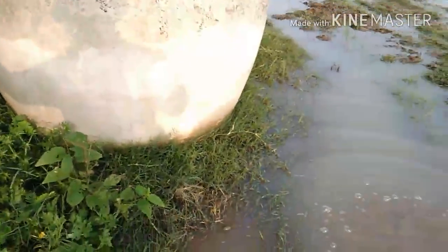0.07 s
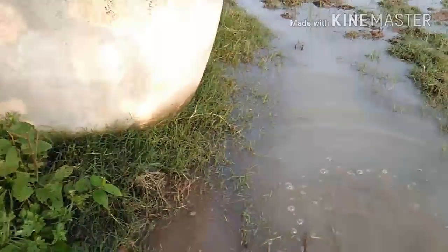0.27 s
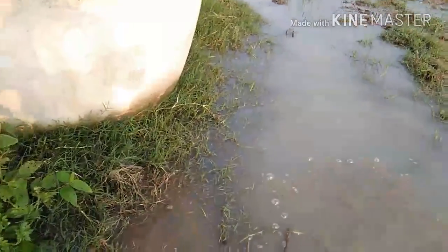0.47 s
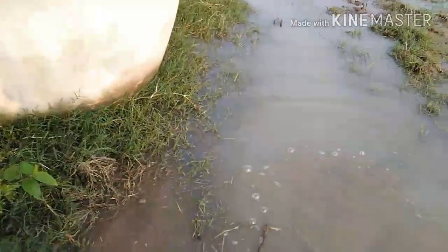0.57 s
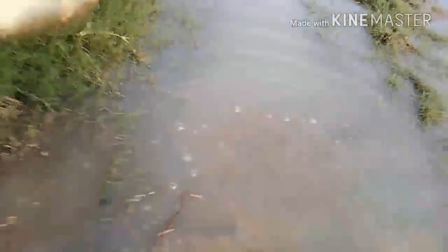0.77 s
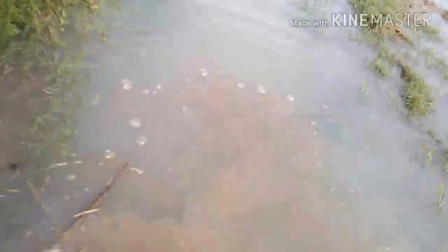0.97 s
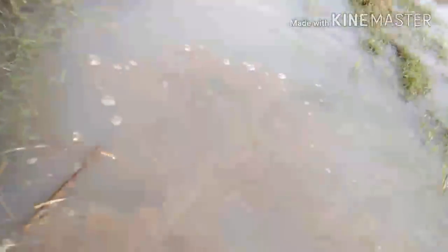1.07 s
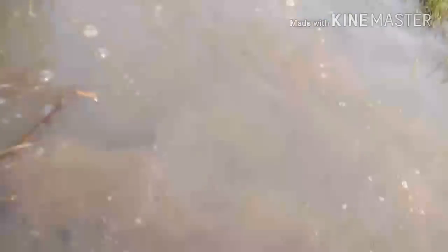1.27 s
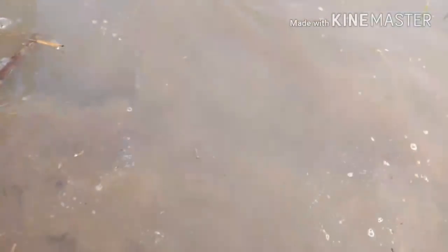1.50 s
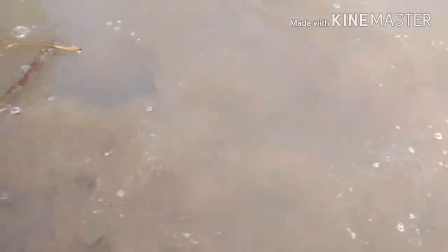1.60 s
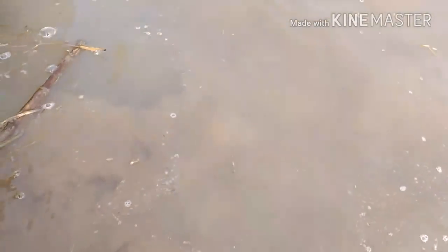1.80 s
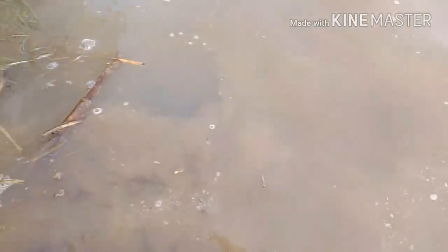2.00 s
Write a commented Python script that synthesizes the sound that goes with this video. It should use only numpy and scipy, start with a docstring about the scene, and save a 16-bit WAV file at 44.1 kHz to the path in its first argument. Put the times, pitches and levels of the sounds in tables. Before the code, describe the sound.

A loud splash in shallow water outdoors: a few quick slaps, a heavy plunge and falling spray. It dies away, then water laps, bubbles and drips close to the microphone while a distant bird chirps faintly.

```python
"""A few slaps, a big splash and falling spray: something plunges into the shallow water of a flooded field.
The sound dies away in the open air and a few drops plop. Water then laps and bubbles close by,
while a distant bird repeats a falling chirp. The splash is thousands of tiny impacts,
each bubble is trapped air ringing like a little bell, and each chirp is a sliding whistle."""
import sys
import numpy as np
from scipy import signal
from scipy.io import wavfile
from scipy.ndimage import uniform_filter1d

SR = 44100
rng = np.random.default_rng(int(sys.argv[2]) if len(sys.argv) > 2 else 0)


def to_wav(sig):
    """Store sig (one row per channel, or 1-D mono) as 16-bit WAV at the path in sys.argv[1].

    Samples outside -1..1 are clipped; the rate is SR.
    """
    pcm = np.clip(np.atleast_2d(sig), -1, 1) * 32767
    pcm = np.round(pcm).astype(np.int16)
    wavfile.write(sys.argv[1], SR, pcm.T)  # frames by channels


N = 90404
T = np.arange(N) / SR

# tone of the churning water, the gulps of air and the spray (frequency [Hz], level [dB])
CHURN_TONE = [(200, -56), (600, -1.5), (1000, -6.5), (1500, -1.5), (2000, -1.5), (2700, -4), (3600, -12.5),
              (4500, -22.5), (6500, -37.5), (15000, -67)]
GULP_TONE = [(40, -47), (120, -30.5), (190, -14), (280, -4), (450, 2.5), (650, -0.5), (900, -6.5),
             (1500, -7), (4000, -51.5)]
SPRAY_TONE = [(1500, -23), (3000, 14), (5000, 6.5), (7000, -3), (10500, 2.5), (12500, -7.5), (15500, -14)]
# slaps on the water (time [s], level [dB], fade time [s], gulp boost [dB], spray boost [dB])
WATER_SLAPS = [(0.128, -32, 0.16, -4.5, 15.5), (0.216, -17.5, 0.24, -3, 7), (0.265, -19, 0.41, -24, 3),
               (0.271, -21, 0.043, -8, 17.5), (0.289, -29, 0.077, 12.5, -10), (0.32, -11.5, 0.59, -6, -11),
               (0.365, -14, 0.37, -7.5, -18), (0.411, -17, 0.23, -4.5, -4), (0.449, -19, 0.26, -6, 2.5),
               (0.512, -20, 0.21, -4, -1.5), (0.561, -38, 0.31, 14, 5), (0.606, -32, 0.12, 6, 10),
               (0.657, -35.5, 0.077, -0.5, 4), (0.932, -58.5, 0.07, 1, 3)]


def splash():
    """Each slap sets off clumps of tiny impacts: churning water, low gulps of air and fine spray."""
    attack_s, hold_s = 0.0014, 0.0034
    churn, gulp, spray = np.zeros((3, N))
    for start, db, fade_s, gulp_db, spray_db in WATER_SLAPS:
        attack = np.clip((T - start) / attack_s, 0, 1)
        slap = amp(db) * attack * fade(np.maximum(T - start - hold_s, 0), fade_s)
        churn += slap ** 2
        gulp += (slap * amp(gulp_db)) ** 2
        spray += (slap * amp(spray_db)) ** 2
    clumps = amp(1.1 * waver(samples=130))

    def layer(power, tone, db, spread_db):
        impacts = clumps * patter(per_s=7000, spread_db=spread_db)
        return amp(db) * np.sqrt(power) * colour(impacts, tone)

    return (layer(churn, CHURN_TONE, db=-1, spread_db=1)
            + layer(gulp, GULP_TONE, db=-5, spread_db=1)
            + layer(spray, SPRAY_TONE, db=-28.5, spread_db=4))


# the deepest plunges (time [s], level [dB])
DEEP_PLUNGES = [(0.218, -54.5), (0.315, -45)]


def thud():
    """A deep plunge pushes the air and makes a soft, low thud."""
    attack_s = 0.0034
    rumble = unit(cut(rng.standard_normal(N), 130, "lowpass"))
    loudness = np.zeros(N)
    for start, db in DEEP_PLUNGES:
        age = np.maximum(T - start, 0)
        loudness += amp(db) * np.minimum(age / attack_s, 1) * fade(age, fade_s=0.22)
    return cut(rumble, hz=35) * loudness


# tone of the sloshing water (frequency [Hz], level [dB])
SLOSH_TONE = [(110, -24.5), (270, 2), (750, 3), (2500, -16), (4200, -41), (15000, -60)]


def slosh():
    """Water already moving before the first slap settles: a dull wash with faint froth on top."""
    wash = colour(patter(per_s=7000, spread_db=4), SLOSH_TONE)
    return amp(-33) * fade(T, fade_s=0.65) * (wash + amp(-44) * froth())


# single bubbles (time [s], pitch [Hz], level [dB], fade time [s], pitch slide [octaves])
AIR_BUBBLES = [(0.231, 660, -6.5, 0.018, -2.9), (0.267, 711, -14, 0.14, 0.017),
               (0.294, 639.3, -17, 0.12, 0.26), (0.322, 1900, -2, 0.021, 1.7),
               (0.335, 626, -19.5, 0.088, 0.59), (0.348, 1685, -11.5, 0.1, 0.46),
               (0.413, 2393, -13.5, 0.097, 0.45), (0.513, 1525, -13.5, 0.031, 0),
               (0.616, 644, -25, 0.11, 0.081), (0.93, 652, -51, 0.057, 0.27),
               (0.991, 642, -54.5, 0.076, -0.2), (1.142, 432, -64, 0.21, 0), (1.232, 1767, -56.5, 0.074, 0),
               (1.485, 894, -38, 0.029, 0.5), (1.57, 1210, -31.5, 0.018, 0.42),
               (1.657, 1126, -27, 0.018, -1), (1.685, 2480, -22, 0.017, 2.2),
               (1.814, 1750, -23.5, 0.017, 0.3), (1.815, 960, -29.5, 0.028, -0.36),
               (1.85, 4160, -31, 0.016, -.3), (1.859, 2010, -22, 0.023, -0.39),
               (1.863, 4360, -34, 0.027, -.35), (1.877, 1427, -13.5, 0.028, 0.58),
               (1.876, 2580, -9, 0.0065, -0.7), (1.883, 1044, -19, 0.06, -0.2),
               (1.89, 3460, -29, 0.032, 2.1), (1.904, 905, -30.5, 0.039, -0.0041),
               (1.92, 1855, -18, 0.043, 0.98), (1.927, 650, -22, 0.02, 0.24), (1.929, 873, -29, 0.094, 0.5),
               (1.94, 417, -43, 0.057, -0.6), (1.956, 2980, -20, 0.008, 1.3),
               (1.982, 2360, -24.5, 0.017, 1.1), (2.008, 1625, -38, 0.036, 1.3),
               (2.028, 2164, -24.5, 0.057, 1.42)]


def bubbles():
    """Trapped air rings. Most bubbles rise in pitch as they near the surface; some slide down."""
    attack_s, slide_s = 0.0012, 0.025
    out = np.zeros(N)
    for start, hz, db, fade_s, octaves in AIR_BUBBLES:
        t = np.arange(0, fade_s, 1 / SR)
        pitch = hz * 2 ** (octaves * np.minimum(t / slide_s, 1) ** 1.9)
        ring = (1 - np.exp(-t / attack_s)) * fade(t, fade_s) * sine(pitch)
        add(out, start, amp(db) * cut(cut(ring, hz / 2), hz / 2))
    return out


# falling drops (time [s], level [dB], pitch [Hz])
DROP_HITS = [(1.66, -26.5, 2380), (1.7825, -14.5, 1850), (1.9209, -22, 2100)]


def drops():
    """A drop striking the surface gives a click just a few vibrations long."""
    out, t = np.zeros(N), np.arange(SR // 50) / SR
    shape = t * fade(t, fade_s=0.001769)
    for start, db, hz in DROP_HITS:
        click = shape / shape.max() * np.sin(2 * np.pi * hz * t)
        add(out, start, amp(db) * cut(cut(click, hz / 2), hz / 2))
    return out


# strength of the close lapping (time [s], level [dB])
LAP_LEVELS = [(1.449, -75.5), (1.483, -51), (1.549, -46.5), (1.595, -57), (1.644, -50), (1.67, -49.5),
              (1.771, -43.5), (1.786, -36), (1.826, -46.5), (1.885, -35.5), (1.95, -46), (1.993, -42),
              (2.029, -29), (2.05, -35.5)]
# tone of the lapping (frequency [Hz], level [dB])
LAP_TONE = [(200, -48.5), (450, -17), (800, -9), (1300, 2), (2300, 3), (3200, -7.5), (4500, -17),
            (6000, -28), (15000, -40)]


def lapping(sizes=36, bubbles_per_s=4200):
    """Many small bubbles and their froth grow louder and softer as the water moves."""
    fizz, t = np.zeros(N), np.arange(SR // 25) / SR
    for hz, (length, slide) in zip(np.geomspace(450, 5000, sizes), rng.random((sizes, 2))):
        ring_cycles = 3.44 * (0.5 + length)
        age = t * hz / ring_cycles
        pitch = hz * (1 + (0.202 * slide - 0.0886) * np.minimum(age, np.pi))  # slides up or down
        ring = (1 - np.exp(-t * hz)) * np.exp(-age) * sine(pitch)
        births = patter(bubbles_per_s / sizes, spread_db=6.5)
        fizz += signal.oaconvolve(births, ring * hz)[:N]
    times, db = np.transpose(LAP_LEVELS)
    loudness = amp(np.interp(T, times, db)) * (T > times[0])
    return loudness * (colour(fizz, LAP_TONE) + amp(-32) * froth())


# small bubbles bursting at the surface (time [s], level [dB], pitch [Hz])
SURFACE_POPS = [(1.595, -57.5, 6700), (1.681, -55.5, 6350), (1.71, -55, 5700), (1.757, -59.5, 10100),
                (1.784, -56, 10900), (1.795, -46.5, 8600), (1.822, -54, 5900), (1.848, -51, 5580),
                (1.891, -48.5, 7980), (1.922, -53, 9900), (1.983, -52, 6240), (2.042, -46, 11200)]


def pops():
    """A bubble's skin bursts with a short, bright spit of noise around one pitch."""
    swell_s = 0.00091
    out, t = np.zeros(N), np.arange(SR // 50) / SR
    shape = t / swell_s * np.exp(1 - t / swell_s)
    for start, db, hz in SURFACE_POPS:
        noise = cut(rng.standard_normal(len(t)), 0.36 * hz, "lowpass")
        spit = unit(noise * np.sin(2 * np.pi * hz * t))
        add(out, start, amp(db) * shape * cut(spit, 13700, "lowpass"))
    return out


def froth(sizes=24, ticks_per_s=1300):
    """The smallest bubbles make scattered high ticks."""
    out, t = np.zeros(N), np.arange(SR // 50) / SR
    for hz in np.linspace(4500, 13500, sizes):
        tick = t * fade(t, fade_s=0.002) * np.sin(2 * np.pi * hz * t) / np.sqrt(hz)
        out += signal.oaconvolve(patter(ticks_per_s / sizes, spread_db=2.5), tick)[:N]
    return unit(out)


# falling chirps (time [s], level [dB], starting pitch [Hz])
BIRD_CHIRPS = [(0.087, -50.5, 3850), (0.715, -51.5, 3833), (1.029, -53, 3704), (1.333, -51, 3837),
               (1.661, -46.5, 3766), (1.97, -54, 3700)]


def bird():
    """A distant bird whistles falling chirps and one note that arches up and back down."""
    chirp_s, fall_hz_per_s, arch_s = 0.1, 15000, 0.09
    out, t = np.zeros(N), np.arange(0, chirp_s, 1 / SR)
    for start, db, hz in BIRD_CHIRPS:
        add(out, start, whistle(hz - fall_hz_per_s * t, db))
    arch_hz = 3680 - 900 * np.linspace(-1, 1, round(arch_s * SR)) ** 2
    add(out, start=1.445, sound=whistle(arch_hz, db=-55))
    return out


def whistle(pitch, db):
    """One slightly rough, fluttering bird note that swells and fades."""
    roughness = 0.026 * waver(samples=40)[:len(pitch)]
    flutter_db = 2.8 * waver(samples=150)[:len(pitch)]
    swell = np.sin(np.pi * np.linspace(0, 1, len(pitch)) ** 0.7) ** 2
    return amp(db + flutter_db) * swell * sine(pitch * (1 + roughness))


# strength of the far birdsong (time [s], level [dB])
FAR_SONG_LEVELS = [(0.97, -81), (1.04, -63), (1.14, -84), (1.21, -90.5), (1.29, -68.5), (1.41, -66.5),
                   (1.7, -71.5)]


def far_birds():
    """Far birds blend into a thin haze of song with a higher twitter."""
    haze_hz, twitter_hz = 2760, 4310
    haze = cut(rng.standard_normal(N), 255, "lowpass") * np.sin(2 * np.pi * haze_hz * T)
    twitter = sine(twitter_hz + 357 * waver(samples=700))
    loudness = amp(np.interp(T, *np.transpose(FAR_SONG_LEVELS)))
    return loudness * (unit(haze) + amp(-8.5) * unit(twitter + field_echo(twitter)))


def with_reflections(x):
    """The sound plus its quick bounces off the ground and the nearby bank."""
    bounces = (patter(per_s=1500, spread_db=0) * fade(T, fade_s=0.055) * (T > 0.002))[:SR // 10]
    return x + amp(-10.5) * signal.fftconvolve(x, bounces / np.linalg.norm(bounces))[:N]


# how long the field's echo lasts (frequency [Hz], fade time [s])
ECHO_FADES = [(100, 0.2), (600, 0.53), (2000, 0.52), (12000, 0.34)]


def field_echo(x):
    """Banks and plants scatter the sound into a soft echo."""
    build_s = 0.011
    hz, t, noise = signal.stft(rng.standard_normal(SR), SR, nperseg=256)
    tail = signal.istft(noise * fade(t, look_up(ECHO_FADES, hz)[:, None]), SR, nperseg=256)[1]
    tail *= np.minimum(np.arange(len(tail)) / SR / build_s, 1)
    return signal.fftconvolve(x, tail / np.linalg.norm(tail))[:N]


# tone of the outdoor background (frequency [Hz], level [dB])
AIR_TONE = [(25, -19.5), (55, -7), (160, -1), (300, -6.5), (600, 3), (1200, -3), (2200, -5.5), (4700, -8),
            (6000, -17), (10000, -21.5), (15500, -31.5)]


def open_air():
    """The faint, steady hush of the outdoors."""
    return amp(-74) * colour(rng.standard_normal(N), AIR_TONE)


def amp(db):
    """Turns decibels into a volume multiplier."""
    return 10 ** (np.asarray(db) / 20)


def unit(x):
    """Scales a signal to an average strength (rms) of 1."""
    return x / np.sqrt(np.mean(x ** 2) + 1e-20)


def fade(t, fade_s):
    """Dies away by 60 dB in each fade time."""
    return np.exp(-np.log(1000) * t / fade_s)


def sine(pitch):
    """A pure tone that follows a changing pitch in Hz."""
    return np.sin(2 * np.pi * np.cumsum(pitch) / SR)


def patter(per_s, spread_db):
    """Random clicks; more spread makes their sizes more uneven."""
    size = amp(spread_db * np.minimum(rng.exponential(1, N), 3))
    return size * rng.choice([-1, 1], N) * (rng.random(N) < per_s / SR)


def waver(samples):
    """A random wobble; smoothing over more samples makes it slower."""
    return unit(uniform_filter1d(uniform_filter1d(rng.standard_normal(N), samples), samples))


def add(mix, start, sound):
    """Mixes a sound in at a start time in seconds."""
    part = mix[max(round(start * SR), 0):][:len(sound)]
    part += sound[:len(part)]


def cut(x, hz, kind="highpass"):
    """Gently removes what lies below hz, or above it with "lowpass"."""
    return signal.sosfilt(signal.butter(2, hz, kind, fs=SR, output="sos"), x)


def look_up(table, hz):
    """Reads between the rows of a frequency table."""
    frequencies, values = np.transpose(table)
    return np.interp(np.log(hz + 1), np.log(frequencies + 1), values)


def colour(x, tone, size=4096):
    """Shapes a sound's lows and highs with a tone table, at strength 1."""
    log_gain = np.log(amp(look_up(tone, abs(np.fft.fftfreq(size, 1 / SR)))))
    response = np.exp(np.conj(signal.hilbert(log_gain)))  # rings after a click, never before
    taps = np.fft.ifft(response).real[:size // 2]
    return unit(signal.oaconvolve(x, taps)[:N])


def scene():
    """Water, birds and background in the open field."""
    plunge = cut(splash(), hz=153) + thud() + slosh()
    close_water = with_reflections(bubbles() + drops() + pops() + lapping())
    song = with_reflections(bird() + far_birds())
    echo = field_echo(amp(-13) * plunge + amp(-18) * close_water + amp(-15) * song)
    return (plunge + close_water + song + echo + open_air())[None]


def record(dry):
    """Rounds off the loudest peaks, then removes the very highest treble."""
    ceiling, top_hz = 0.66, 15600
    rounded = dry / (1 + (dry / ceiling) ** 6) ** (1 / 6)
    lowpass = signal.firwin(511, top_hz, window=("kaiser", 9), fs=SR)
    return signal.oaconvolve(rounded, lowpass[None], "same")


dry = scene()
out = record(dry)
to_wav(out)
```